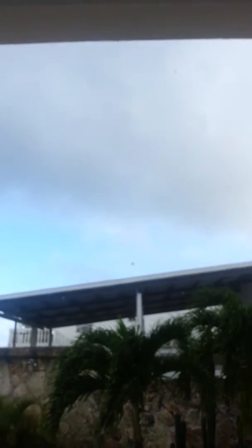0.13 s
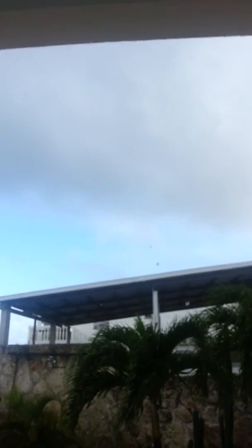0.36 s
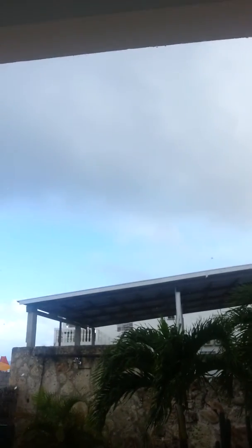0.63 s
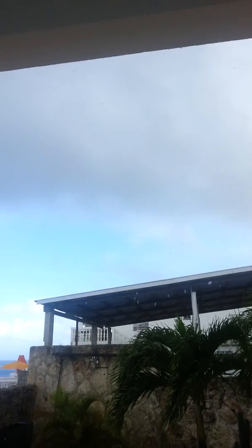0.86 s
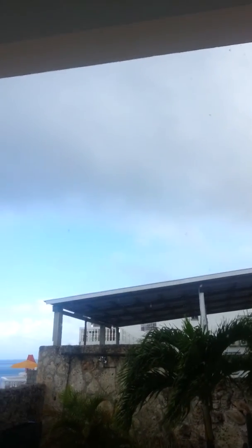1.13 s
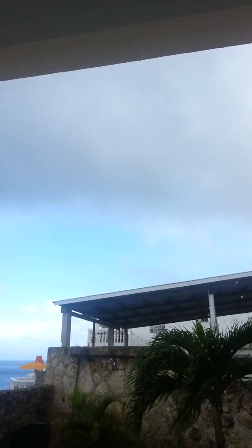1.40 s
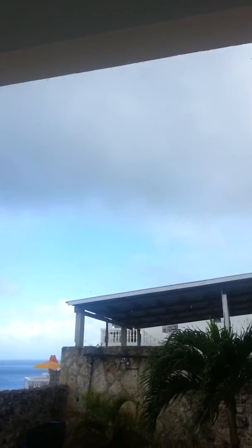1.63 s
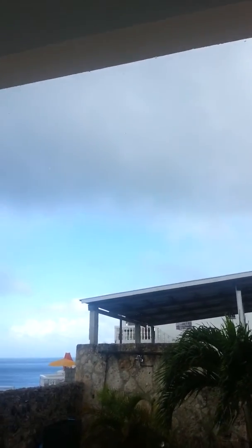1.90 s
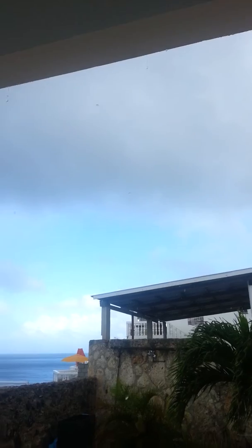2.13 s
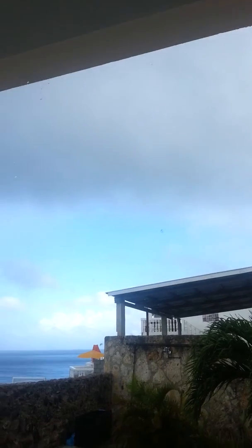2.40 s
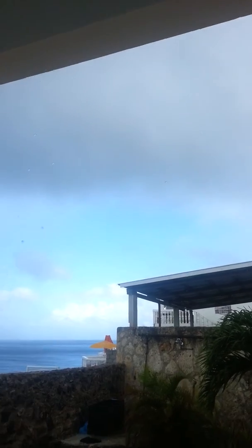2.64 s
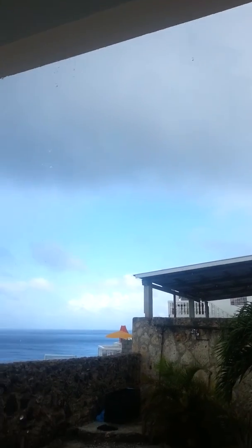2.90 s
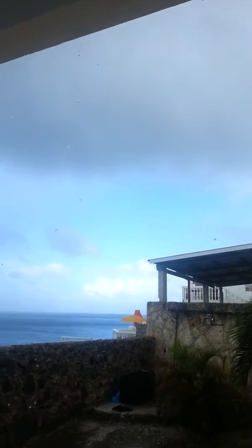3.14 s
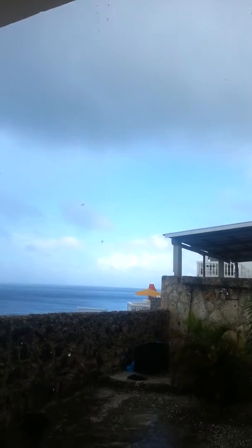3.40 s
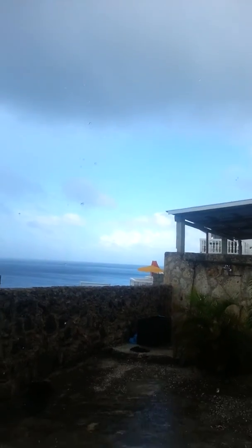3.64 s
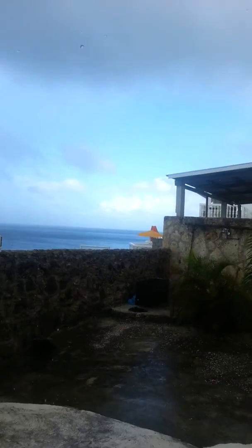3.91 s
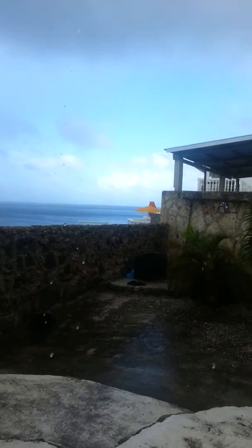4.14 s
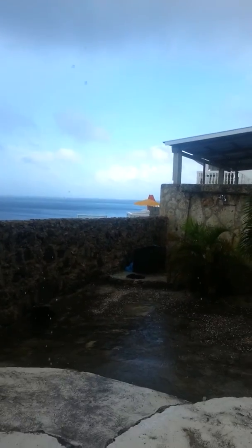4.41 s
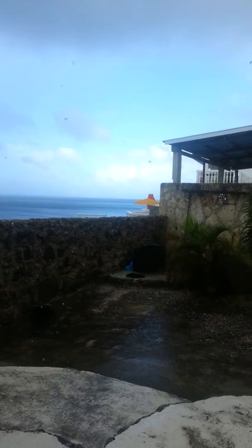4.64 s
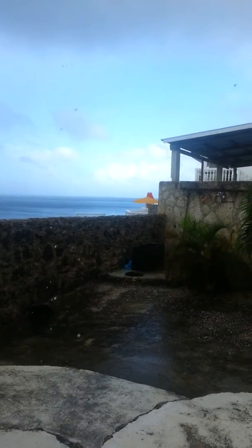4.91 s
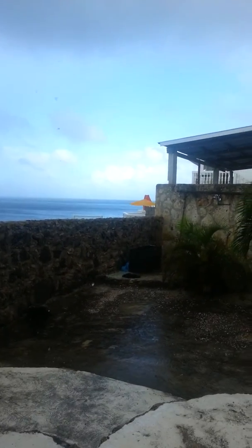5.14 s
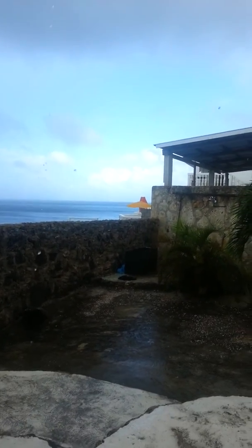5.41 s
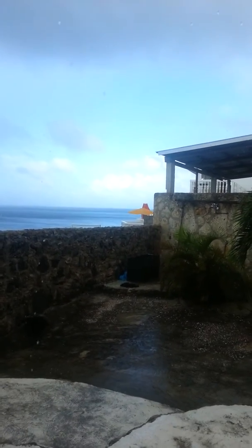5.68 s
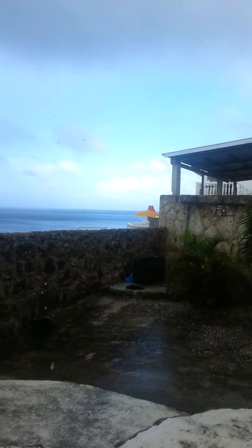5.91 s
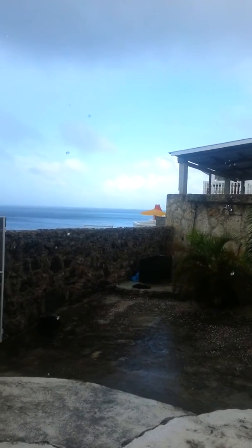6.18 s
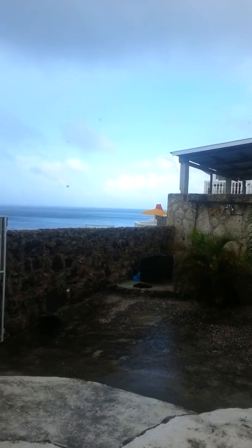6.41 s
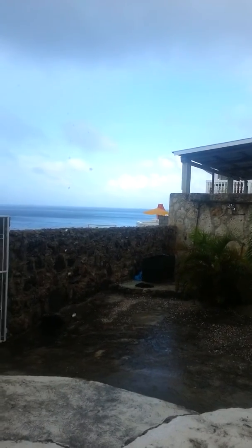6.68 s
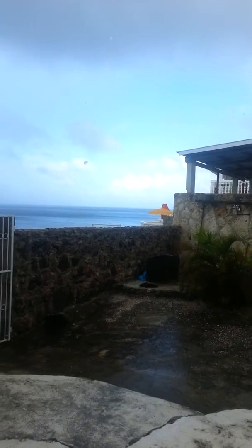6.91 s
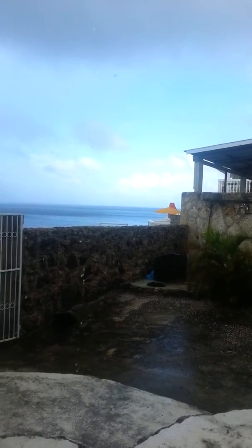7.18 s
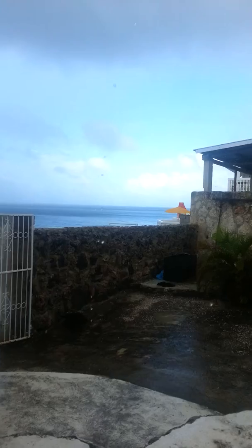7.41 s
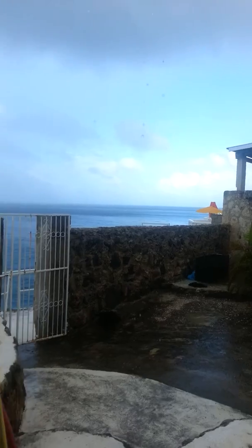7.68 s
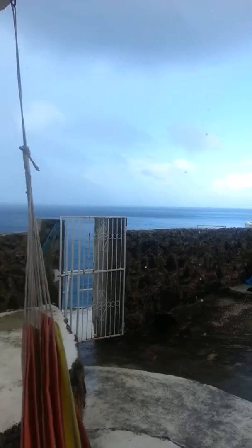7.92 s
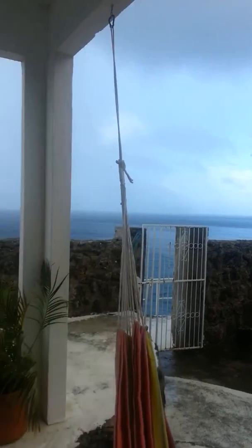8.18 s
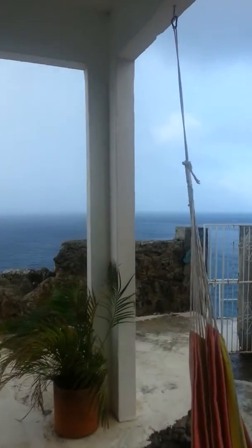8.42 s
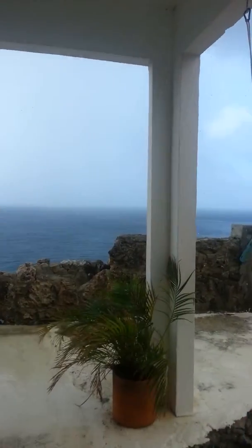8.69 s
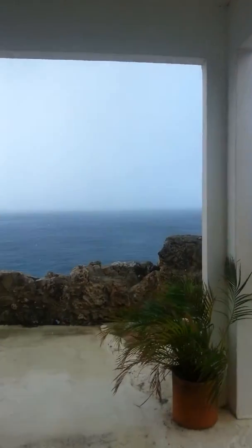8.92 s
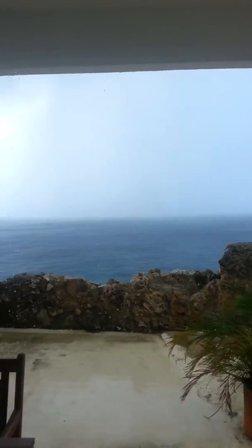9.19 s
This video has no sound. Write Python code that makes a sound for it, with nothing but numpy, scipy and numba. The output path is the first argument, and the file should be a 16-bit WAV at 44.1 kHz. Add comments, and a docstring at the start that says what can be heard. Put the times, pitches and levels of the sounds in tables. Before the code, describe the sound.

Close roof runoff splatters in quick irregular gulps on wet concrete, with sharp ringing drops and puddle plops over a soft, steady rain hiss.

```python
"""Rain on a concrete terrace: eave runoff breaks into gulps of ringing droplets that splatter on the wet slab.
Far rain is shaped noise; heavy drops slap the concrete and ring, fat drops plop low into a puddle. Ceiling,
floor and back wall of the porch return drops and plops as early echoes and a diffuse noise tail. A phone with
two microphone ports under the porch roof colours the sound and cuts bass and top. Apart from that, the level
just below the bass cut wavers and faint deeper bass flickers at random."""
import sys
import numpy as np
from scipy import signal
from scipy.fft import rfft, irfft, next_fast_len
from scipy.io import wavfile
from scipy.ndimage import uniform_filter1d
from numba import njit

SR = 44100
rng = np.random.default_rng(int(sys.argv[2]) if len(sys.argv) > 2 else 0)


def dump_mix(stems):
    """Bounce the given channels to the path in sys.argv[1] as a 16-bit WAV at rate SR."""
    frames = np.atleast_2d(stems).T  # one column per channel
    limited = np.clip(frames, -1, 1)  # hard clip at full scale
    pcm = np.round(limited * 32767).astype(np.int16)
    wavfile.write(sys.argv[1], SR, pcm)


def boost_factor(decibels):
    """Convert a level in decibels to a linear amplitude factor."""
    exponent = np.asarray(decibels, float) / 20
    return 10 ** exponent


N = 410571
# transform length [samples]
SPAN = next_fast_len(N, True)


def shape(points):
    """Value columns of a (frequency [Hz], value, ..) table on the FFT bins, linear in log frequency."""
    hz, *values = np.transpose(points)
    log_bins = np.log(np.arange(SPAN // 2 + 1) * SR / SPAN + 1)
    return np.array([np.interp(log_bins, np.log(hz), v) for v in values])


def walk(rate_hz):
    """Random levels held 1 / rate_hz s, smoothed twice; spread near 1."""
    hold = int(SR / rate_hz)
    steps = np.repeat(rng.standard_normal(N // hold + 1), hold)
    return 1.3 * uniform_filter1d(uniform_filter1d(steps, hold), hold)[:N]


# far rain on ground and leaves, relative spectrum: (frequency [Hz], density [dB per Hz])
HISS_SPECTRUM = [(40, -23), (120, -16.5), (200, -17), (240, -8), (280, -7.5), (460, -3.5), (900, -0.5),
                 (1500, -1), (3000, 0.5), (6000, -4.5), (10000, -11.5), (14500, -15.5)]
# port correlation for sound from all round: (frequency [Hz], correlation [-])
PORT_LIKENESS = [(60, 0.3), (130, 1), (290, 0.71), (640, 0.77), (1410, 0.07), (3100, 0.15), (6820, 0),
                 (15000, -0.01)]
# far rain, 300-1300 Hz, ahead of the near-1 dB swell and the phone: (time [s], level [dB])
HISS_LEVEL_CURVE = [(0, -34.5), (1, -36.5), (1.8, -35.5), (2.4, -38.5), (3, -36.5), (5.3, -36), (5.8, -35),
                    (6.6, -36), (8, -35.5), (9.31, -37.5)]


def far_rain():
    """Countless far drops merge into gently swelling noise; ports agree mostly at low frequencies."""
    like = np.clip(shape(PORT_LIKENESS)[0], 0, 1)
    mid, side = rfft(rng.standard_normal((2, SPAN))) * boost_factor(shape(HISS_SPECTRUM))
    mid, side = mid * np.sqrt(1 + like), side * np.sqrt(1 - like)
    hiss = irfft(np.array([mid + side, mid - side]), SPAN)[:, :N]
    body_band = signal.butter(4, [300, 1300], "band", fs=SR, output="sos")
    body = signal.sosfilt(body_band, hiss.mean(axis=0))
    level_db = np.interp(np.arange(N) / SR, *np.transpose(HISS_LEVEL_CURVE))
    return hiss / body.std() * boost_factor(level_db + .9 * walk(8))


@njit
def ring(start, hz, cycles, size):
    """Each impact is a sine that swells to its peak after the given cycles, then dies away."""
    out = np.zeros(N + 2048)
    for k in range(len(start)):
        rate = hz[k] / (cycles[k] * SR)
        turn = np.exp(2j * np.pi * hz[k] / SR - rate)
        z = size[k] * np.e * rate + 0j  # envelope peak = size
        for i in range(min(2000, int(9 / rate))):
            out[start[k] + i] += i * z.imag
            z *= turn
    return out[:N]


def impacts(s, hz, db, pan_db, cycles, lag_s, detune):
    """Impacts at both ports; each has its own place, so delay, pitch and level differ left and right."""
    place, tint, sign = rng.standard_normal((len(s), 3)).T
    # sound from the eave mostly reaches the right port a little earlier
    lag = lag_s * (.5 + place)
    ports = []
    for side in (1, -1):
        start = np.clip((s + side * lag / 2) * SR, 0, N - 1).astype(np.int64)
        pitch = np.clip(hz * np.exp(side * detune * tint), 300, .4 * SR)
        size = np.sign(sign) * boost_factor(db + side * pan_db / 2)
        ports.append(ring(start, pitch, cycles + 0 * s, size))
    return np.array(ports)


def shower(when, per_s, level_db, centre_hz, octaves, scatter_db, cycles):
    """Random droplets whose level and pitch follow the flow; scatter_db makes a few larger."""
    count = int(per_s * N / SR)
    s = rng.random(count) * N / SR
    hz = np.interp(s, when, centre_hz) * 2 ** (octaves * rng.standard_normal(count))
    size_db = scatter_db * np.minimum(rng.exponential(size=count), 3.6)
    # scale so that the mean of the two ports has the power of the level curve
    energy = np.mean(boost_factor(size_db) ** 2 * cycles / hz) * np.e ** 2 / 16
    db = size_db + np.interp(s, when, level_db) - 10 * np.log10(per_s * energy)
    return impacts(s, hz, db, 3.33 * rng.standard_normal(count), cycles, lag_s=.0004, detune=0.097)


# eave water: (start [s], length [s], splatter level ahead of sag [dB],
# droplet pitch ahead of runoff()'s factors [Hz], spray re splatter [dB])
EAVE_GULPS = [(0.0, 0.08, -30.5, 3270, -8), (0.07, 0.05, -26.0, 3300, -10), (0.125, 0.03, -23, 4100, -15),
              (0.208, 0.05, -34.0, 3060.0, -3), (0.28, 0.03, -27.0, 3940, -13),
              (0.426, 0.012, -29.5, 4120, -8), (0.502, 0.08, -28.5, 4100, -11),
              (0.583, 0.05, -24.5, 3900, -10), (0.75, 0.02, -26.5, 3800, -7),
              (0.809, 0.12, -28.5, 3600, -6.5), (0.855, 0.12, -32.5, 3980, -6),
              (1.089, 0.12, -26, 3450.0, -9), (1.232, 0.05, -25, 3540, -11),
              (1.402, 0.13, -26.5, 3750, -7.5), (1.476, 0.011, -25.5, 5340, -13),
              (1.558, 0.12, -28.5, 3900, -9), (1.707, 0.03, -25.5, 4100.0, -10),
              (1.756, 0.12, -26.5, 3860, -7.5), (1.863, 0.012, -23, 4050, -8),
              (2.029, 0.012, -23.5, 5150, -17), (2.093, 0.08, -27.5, 3200, -9),
              (2.202, 0.08, -25.5, 3650, -11), (2.353, 0.012, -28, 2700, -16),
              (2.521, 0.08, -27.5, 3370, -6.5), (2.63, 0.03, -29.0, 4230, -5),
              (2.71, 0.12, -26.5, 3600, -8), (2.747, 0.012, -23, 3700, -13), (2.928, 0.12, -26, 3560, -9),
              (3.062, 0.013, -26.5, 4400.0, -9), (3.143, 0.03, -26.5, 3840, -12),
              (3.223, 0.08, -27, 3800, -8), (3.32, 0.08, -23.5, 3070, -10), (3.445, 0.12, -30, 4050, -7),
              (3.517, 0.012, -30, 2700, -3), (3.652, 0.12, -27, 4130, -7.5),
              (3.784, 0.046, -31.5, 3600, -16), (3.882, 0.12, -29.5, 4060, -6.5),
              (3.995, 0.03, -29, 3700, -8), (4.123, 0.05, -23.5, 3730, -6.5),
              (4.255, 0.08, -24.5, 4150, -11), (4.364, 0.03, -25.5, 3900, -17),
              (4.415, 0.03, -27.5, 3900, -9), (4.466, 0.012, -26, 4400, -7), (4.508, 0.014, -28, 3820, -9),
              (4.557, 0.12, -30, 3500, -8), (4.605, 0.011, -25.5, 5540, -9),
              (4.711, 0.033, -26.5, 3730, -5.5), (4.835, 0.05, -24.5, 4100, -7.5),
              (4.935, 0.12, -28.5, 3230, -8), (5.117, 0.01, -25, 3770, -5), (5.194, 0.12, -30.5, 3570, -4),
              (5.356, 0.03, -24, 3750, -15), (5.529, 0.035, -27.5, 3450, -8),
              (5.626, 0.03, -26.5, 4350, -11), (5.703, 0.12, -26, 3700, -8),
              (5.809, 0.12, -29.0, 3660, -6.5), (5.994, 0.028, -23, 4220, -15),
              (6.088, 0.012, -24, 3200, -10), (6.172, 0.12, -28, 3360, -10),
              (6.251, 0.012, -25.5, 2880, -15), (6.312, 0.12, -30, 4020, -3),
              (6.469, 0.12, -27.0, 3850, -13.5), (6.668, 0.12, -30.5, 3660, -8),
              (6.784, 0.012, -28.5, 5390.0, -6), (6.88, 0.08, -31.0, 3850, -7),
              (7.027, 0.12, -29.5, 3600, -3.5), (7.137, 0.03, -23, 3900, -21),
              (7.159, 0.12, -29.5, 3800, -13), (7.253, 0.12, -29, 3700, -13),
              (7.344, 0.12, -30.5, 3580, -8), (7.416, 0.08, -29, 3340, -8),
              (7.552, 0.05, -24, 4100.0, -7.5), (7.729, 0.05, -26.5, 3500, -7),
              (7.851, 0.05, -27.0, 3650, -9), (7.963, 0.08, -27.0, 3720.0, -4.5),
              (8.089, 0.08, -29, 4100.0, -10), (8.189, 0.12, -28.5, 3370, -6),
              (8.396, 0.08, -28.5, 3340, -5), (8.467, 0.03, -28.5, 4230, -17),
              (8.507, 0.12, -27.0, 3630, -6), (8.58, 0.1, -29.5, 3120, -4), (8.81, 0.05, -31.0, 3930, -11),
              (8.873, 0.12, -27, 3560, -7.5), (8.915, 0.012, -22.5, 3200, -13),
              (9.028, 0.012, -28.5, 3820, -1), (9.07, 0.12, -29, 4430, -5.5),
              (9.22, 0.08, -26.0, 3600, -3.5)]
GULP_ATTACK_S, GULP_SAG_S, GULP_RELEASE_S = .004, .2, 0.027
# steady trickle, pitch ahead of the same factors
TRICKLE_DB, TRICKLE_HZ, TRICKLE_SPRAY_DB = -34.5, 4100, -39.5


def flow():
    """Splatter level, droplet pitch and spray level each ms: overlapping gulps add their power."""
    t = np.arange(0, N / SR + .001, .001)
    s, length_s, db, hz, spray_db = np.transpose(EAVE_GULPS)[:, :, None]
    attack = np.clip((t - s) / GULP_ATTACK_S, 0, 1)
    sag = np.exp(-np.clip(t - s, 0, length_s) / GULP_SAG_S)
    release = np.exp(-np.maximum(t - s - length_s, 0) / GULP_RELEASE_S)
    power = attack * sag * release * boost_factor(db) ** 2
    trickle = boost_factor(TRICKLE_DB) ** 2
    total = power.sum(axis=0) + trickle
    ring_hz = ((power * hz).sum(axis=0) + trickle * TRICKLE_HZ) / total
    spray = (power * boost_factor(spray_db) ** 2).sum(axis=0) + boost_factor(TRICKLE_SPRAY_DB) ** 2
    return t, 10 * np.log10(total), ring_hz, 10 * np.log10(spray)


def runoff():
    """Gulps and trickle throw coarse splatter, its pitch wandering as the stream breaks up, and bright spray."""
    when, db, hz, spray_db = flow()
    wander_octaves = .12 * np.interp(when, np.arange(N) / SR, walk(45))
    splatter_hz = 1.108 * hz * 2 ** wander_octaves
    splatter = shower(when, 1400, db, splatter_hz, octaves=0.28, scatter_db=2.3, cycles=1.2)
    spray = shower(when, 2200, spray_db, 9500 + 0 * hz, octaves=0.38, scatter_db=0.0, cycles=0.79)
    return splatter + spray


MIDDLING_PER_S, MIDDLING_RING_DB, MIDDLING_SCATTER_DB = 16, -17.5, 1.5
MIDDLING_SLAP_RE_RING_DB, MIDDLING_OCTAVES = -5, .3
MIDDLING_PAN_DB = 4  # both mean and spread


def middling_drops():
    """Rows like the heaviest drops, at random moments that crowd where the flow is strong."""
    when, db, hz, _ = flow()
    share = np.cumsum(boost_factor(db) ** 2)
    count = int(MIDDLING_PER_S * N / SR)
    quantile = (np.arange(count) + rng.random(count)) / count
    s = np.interp(quantile, share / share[-1], when)
    chance = rng.standard_normal((count, 4)).T
    ring_db = MIDDLING_RING_DB + MIDDLING_SCATTER_DB * np.clip(chance[0], -2, 2)
    ring_hz = np.interp(s, when, hz) * 2 ** (MIDDLING_OCTAVES * chance[1])
    slap_db = ring_db + MIDDLING_SLAP_RE_RING_DB + MIDDLING_SCATTER_DB * np.clip(chance[2], -2, 2)
    return np.array([s, ring_db, ring_hz, slap_db, MIDDLING_PAN_DB * (1 + chance[3])])


# heaviest drops, levels ahead of the filters:
# (time [s], ring peak [dB], ring [Hz], slap peak [dB], left minus right [dB])
HEAVIEST_DROPS = [(0.101, -10, 3500.0, -16.0, 12), (0.1194, -4, 2950, -13.5, 5.5),
                  (0.138, -7, 4500, -6, -4), (0.144, -6, 3900, -7, 4), (0.147, -1, 4210, -9, 10),
                  (0.286, -10, 3900, -13, -2), (0.307, -8, 4900, -11, 12), (0.5495, -12, 6940, -14, 2),
                  (0.5904, -5, 4770, -15, 0.0), (0.76, -12, 4300.0, -17, 2), (0.8884, -3, 3780, -13, -8),
                  (1.104, -4, 4400.0, -18, 3), (1.123, -6, 4170, -14, -1), (1.136, -1, 3840, -5, 4.0),
                  (1.222, -5, 3800, -15, -3), (1.262, -8, 3800, -16, 3), (1.396, -7, 4330, -20, 5),
                  (1.4395, -12, 5700, -11, 0), (1.488, -5, 4900.0, -9.0, 4), (1.5249, -13, 4470.0, -4, -3),
                  (1.6163, -8, 3050, -2, 7), (1.6456, -17, 5000, -7, 5), (1.7153, -16, 4040.0, -12, -4),
                  (1.7775, -3, 3570, -28.0, 3), (1.866, -11, 3220, -7.0, -1), (1.8778, -21, 4130, -14, 4.0),
                  (1.9875, -9, 4860, -3, 5), (2.0373, -7, 4820, -15, 1), (2.1074, -7, 3360, -8, 4),
                  (2.2277, -11, 3480, -17.0, -5), (2.2497, -14, 3730.0, -5, 0.0),
                  (2.2563, -4, 4110.0, -12.0, -2.0), (2.274, -8, 4160.0, -16, -3.0),
                  (2.277, -8, 4120, -20, 12), (2.359, -17, 3000, -20, 7), (2.531, -17, 3540, -18, 2),
                  (2.552, -6, 3900, -17, 1), (2.649, -10, 4900, -16, -1), (2.729, -8, 3920, -13, 14),
                  (2.7321, -9, 4340, -19, 8), (2.9365, -20, 5000, -9, 0), (3.009, -5, 2950, -20, -5),
                  (3.0853, -9, 4700, -5, -3), (3.143, -19, 4070, -17, 2), (3.233, -9, 3850, -7, 5),
                  (3.3229, -23, 4830, -0.5, 13), (3.3955, -11, 2840, -19, -6), (3.4515, -8, 3820, -16, 4),
                  (3.5348, -8, 3150.0, -12, 7), (3.5374, -6, 3360, -16, 9), (3.657, -10, 5100, -15, 2),
                  (3.6667, -10, 4730.0, -11, -7), (3.702, -5, 4970, -15, 3), (3.8012, -5.5, 3300, -4, 9),
                  (3.8293, -4, 4100, -13, 10), (3.893, 0, 3860, -32, 5), (3.978, -14, 5000, -4, 0),
                  (3.9875, -5, 5100, -13, 2), (4.0215, -6, 3520, -11, -8), (4.1085, -10, 4540, -10, 4),
                  (4.113, -14, 4530, -16, 2), (4.1325, -5, 3980.0, -16, -2), (4.1414, -9, 4200, -16, -6),
                  (4.1601, -4, 3750, -17, -2), (4.2125, -10, 6500, -8, 2), (4.217, -18, 3940, -12, 2),
                  (4.3142, -2, 4600, -12, 0), (4.3372, -5, 6000, -3, -1), (4.3665, -7, 4060, -14, 0),
                  (4.3808, -3, 4360, -7, 1), (4.3846, -6, 4260, -6, -8), (4.389, -16, 4800, -12, 2),
                  (4.4229, -4.5, 4400, -21, -1), (4.4776, -5, 4220, -16, 11),
                  (4.5069, -16, 4560.0, -8, 3.0), (4.6064, -13, 3900.0, -6, 9),
                  (4.6205, -8, 4720.0, -13.0, -7), (4.716, -9, 3200.0, -17, 6.0),
                  (4.843, -16, 4590, -17, -2), (4.8568, -8, 4200, -15, -3), (4.9537, -10, 2790, -18, 10),
                  (4.9981, -22, 4850.0, -5, 2), (5.028, -8, 4000.0, -19.0, 10),
                  (5.1255, -15, 3640.0, -17, 21.5), (5.3464, -8, 4300.0, -21, 14),
                  (5.3715, -12, 4000.0, -15, 0), (5.541, -14, 4590, -17, 3), (5.6325, -15, 3840, -14, 2),
                  (5.716, -14, 3460, -12, 0), (5.724, -1, 4050, -12, -6), (5.7342, -9, 4480.0, -15.0, 0.0),
                  (5.7559, -8, 4100, -18.0, 0.0), (5.7809, -13, 4060.0, -8.0, 6.0),
                  (5.8165, -3.5, 3700, -15, 1.5), (5.8968, -7, 5110.0, -5, 2), (6.005, -5, 4280.0, -17, 6),
                  (6.0833, 5, 4370, 0, 8), (6.0908, -5, 3180, -17, 4), (6.1795, -7, 2840, -20.0, 2),
                  (6.2482, -5, 3350, -6, 1.0), (6.262, -1, 3150.0, -5, -7), (6.2682, -7, 3630.0, -4, 6),
                  (6.3147, -4, 4040, -11.0, 6), (6.396, -10, 5470, 1, 1), (6.481, -8, 3360, -18, 2),
                  (6.488, -5, 3400, -18.0, -2), (6.5784, -4, 6040, -11, 16), (6.7695, -16, 5200, -7, -4),
                  (6.7762, -4, 5000, -18, -4), (6.885, -4, 4270, -12, -2), (7.0654, -8, 3570, -2.5, 8),
                  (7.0745, -17, 4300, -10, -1), (7.137, -7, 4020, -16, -1.0), (7.1437, -6, 4200, -15.0, -4),
                  (7.1543, -5, 3520, -17.0, 7), (7.169, -9, 3770.0, -15, 2), (7.217, -12, 4800, -11, -13),
                  (7.2466, -6, 4020.0, -10, -17), (7.272, -16, 5000, -14, 2), (7.3395, -6, 4540, -6, 5),
                  (7.436, -8.5, 2600.0, -22, 4), (7.4736, -3.5, 4700, -13, 16), (7.5697, -8, 4820.0, -8, 0),
                  (7.735, -4, 4400, -15.0, 0), (7.852, -11, 4000, -20, 4), (7.8807, -6, 4000, -18, 3),
                  (7.9954, -5, 4110, -12.0, -8), (8.11, -7.5, 4000, -19, 1), (8.1691, -12, 4080, -4, -4),
                  (8.234, -8, 3930, -18, 4), (8.2573, -6, 4250, -22, 7), (8.2858, -4, 4240, -21.0, 7.5),
                  (8.4155, -4.0, 3900, -14.0, -4), (8.4715, -8, 3300, -19, 3), (8.487, -5, 4170, -19, 4),
                  (8.4914, -9, 4100, -15, 0), (8.5678, -3, 3120, -17.0, -2), (8.572, -2, 3060, -17.0, 0),
                  (8.9166, -8.0, 3160.0, -6, -10), (8.9246, -8, 2990.0, -15, -5),
                  (8.9534, -6, 4100.0, -11.0, -3.0), (9.0396, -16, 4460, -8, 2),
                  (9.2289, -19, 4600, -6, 10), (9.2379, -11, 4300, -12, -9), (9.249, -8, 4200.0, -10, 0),
                  (0.1564, -10, 4260, -15, 3.0), (0.7514, -12, 5000, -13, 3.5), (0.818, -11, 3100, -16, 1),
                  (0.8584, -9, 3820, -13, 2.0), (0.9024, -13, 3780, -13, 3.0),
                  (1.4124, -17, 4360, -21, 3.5), (1.6387, -9, 3010, -13, -2), (1.7204, -18, 4720, -13, 1.5),
                  (2.8304, -8, 3840, -16, 6), (3.0424, -10, 2950, -11, 2.5), (3.2725, -8, 4470, -15, 1.0),
                  (3.4084, -4, 3690, -15, 4.5), (3.4544, -10, 4250, -18, 4.0), (3.7214, -5, 3600, -13, 4.0),
                  (3.7374, -14, 3540, -13, 2.0), (5.8074, -12, 4040, -15, 4.0),
                  (5.8784, -16, 2920, -13, 1.5), (6.0204, -10, 4590, -13, 3.5),
                  (6.1069, -16, 3720, -13, 3.0), (6.2154, -11, 4030, -9, 3.5),
                  (6.4534, -15, 4600, -11, 2.5), (6.5004, -9, 3560, -11, 3.5), (6.7824, -8, 5050, -13, 1.5),
                  (7.0374, -9, 2720, -13, 1.0), (7.1764, -10, 4290, -13, 2.0), (7.2654, -7, 3920, -13, 4.0),
                  (7.3334, -10, 4550, -13, 3.0), (7.5814, -9, 5100, -13, 2.0), (7.5874, -14, 2920, -13, 0),
                  (7.6204, -19, 4110, -13, 3.5), (8.1738, -11, 5030, -17, 1.0),
                  (8.4284, -15, 3570, -13, 1.5), (8.8894, -11, 2870, -7, -2), (8.9464, -11, 3270, -13, 0),
                  (8.9574, -13, 3860, -13, 3.5), (9.0754, -11, 4700, -13, -0.5),
                  (9.0824, -16, 4760, -11, 1.5)]
# early porch reflections, shared with plops(): (mean delay [s], base level [dB])
PORCH_ECHOES = [(.0032, -10), (.0070, -10)]


def heavy_drops():
    """A bright slap on concrete, a short ring of the water film, and echoes with a delay of their own."""
    s, db, hz, slap_db, pan_db = np.hstack([np.transpose(HEAVIEST_DROPS), middling_drops()])
    slap_hz = 7400 * 2 ** (.2 * rng.standard_normal(len(s)))
    out = impacts(s, slap_hz, slap_db, pan_db, cycles=.7, lag_s=.00025, detune=.15)
    out += impacts(s, hz, db, pan_db, cycles=.8, lag_s=.00016, detune=.12)
    for delay_s, echo_db in PORCH_ECHOES:
        late_s = delay_s * (1 + .12 * rng.standard_normal(len(s)))
        out += impacts(s + late_s, 0.92 * hz, db + echo_db, 0 * pan_db,
                       cycles=1.6, lag_s=0.00045, detune=0.15)
    return out


# fat drops into the puddle, levels ahead of the filters:
# (time [s], peak [dB], ring [Hz], left minus right [dB])
PUDDLE_PLOPS = [(0.0952, -11, 2130, 2), (0.6394, -14, 2570, 6), (1.0959, -17, 2620, 5.5),
                (1.135, -14, 2590, 3.0), (1.171, -5, 2660, 2), (1.4482, -10, 2470, -2),
                (1.615, -12, 2580, 4.0), (1.7944, -20, 2140, 4.0), (1.8716, -11, 2620, 3.0),
                (2.1056, -17, 3000, 4.0), (2.144, -16, 2540, 2), (2.1594, -23, 2260, 4.0),
                (2.2104, -11, 2840, 4.5), (2.2324, -14, 2300, 4), (2.359, -18, 2740, 6.5),
                (2.3844, -24, 2870, 4.0), (3.0106, -20, 2300, 2), (3.349, -8, 2970, 4.5),
                (3.36, -8, 2780, -0.5), (3.3704, -6, 2590, 0), (3.4007, -9, 1810, 1),
                (3.4144, -16, 2150, 5.5), (3.5342, -19, 2470, 4.5), (4.1637, -18, 2570, 6.5),
                (4.368, -7, 2530, 7), (4.3814, -9, 2760, 7), (4.7156, -19, 2490, 4.5),
                (4.9493, -17, 2910, 5.0), (5.026, -15, 2440, 5.5), (5.8117, -15, 2590, 4.0),
                (5.8294, -16, 2270, 3.0), (6.0835, -10, 2870, 8), (6.179, -25, 2260, 0),
                (6.2606, -14, 2610, 0), (6.3142, -10, 2940, 5.5), (6.5755, -15, 2200, 3.5),
                (7.1367, -10, 2980, 8), (7.2609, -15, 2200, 5.0), (7.428, -7, 2500, 4.5),
                (7.4494, -22, 2360, 4.5), (8.0444, -13, 2520, 2.0), (8.2846, -11.5, 2130, 11),
                (8.3094, -14, 2030, 6.5), (8.5667, -11, 1960, 4), (8.5724, -11.5, 1960, 5.0),
                (8.5897, -9, 2130, 4.5), (8.6727, -13, 2350, 3.5), (8.9156, -15, 2620, 3.5),
                (8.991, -10, 2210, 2)]
PLOP_CYCLES, PLOP_ECHO_BOOST_DB = 1.15, 2


def plops():
    """A drop into standing water rings low for a few cycles; the porch repeats it."""
    s, db, hz, pan_db = np.transpose(PUDDLE_PLOPS)
    out = impacts(s, hz, db, pan_db, PLOP_CYCLES, lag_s=.0001, detune=0.048)
    for delay_s, echo_db in PORCH_ECHOES:
        late_s = delay_s * (1 + 0.11 * rng.standard_normal(len(s)))
        out += impacts(s + late_s, hz, db + echo_db + PLOP_ECHO_BOOST_DB, pan_db,
                       PLOP_CYCLES, lag_s=0.00027, detune=0.19)
    return out


# diffuse tail: (low edge [Hz], high edge [Hz], level re smoothed hits [dB], 60 dB decay [s])
PORCH_TAIL = [(1600, 2400, -6, .3), (2400, 3400, -5, .3), (3400, 4600, -3.5, .3), (4600, 6200, -3.5, .26),
              (6200, 9000, -4, .2), (9000, 13500, -5, .16)]


def porch(hits):
    """The diffuse tail: in each band, noise that builds up after a splat and dies away."""
    out = 0
    for low_hz, high_hz, db, t60_s in PORCH_TAIL:
        band = signal.butter(2, [low_hz, high_hz], "band", fs=SR, output="sos")
        power = np.mean(signal.sosfilt(band, hits) ** 2, axis=0)
        decay_keep = boost_factor(-120 / (t60_s * SR))
        build_keep = np.exp(-1 / (.005 * SR))
        for keep in (decay_keep, build_keep):
            power = signal.lfilter([1 - keep], [1, -keep], power)
        noise = signal.sosfilt(band, rng.standard_normal((2, N)))
        out = out + boost_factor(db) * np.sqrt(power) * noise / noise.std()
    return out


def scene():
    """Near water in the porch over the far rain."""
    drops = heavy_drops() + plops()
    # a thin film on solid concrete radiates no bass
    no_bass = signal.butter(2, 1300, "high", fs=SR, output="sos")
    near = signal.sosfilt(no_bass, runoff() + drops)
    return near + porch(drops) + far_rain()


# microphone port colour: (frequency [Hz], left gain [dB], right gain [dB])
PORT_COLOUR = [(696, 1.5, 1.5), (1340, 2.5, -0.5), (2210, 3, -1.5), (3150, -1, -3), (4100, 2.5, -3),
               (4900, 1.5, 0.5), (6100, -3, 1), (6500, 0.5, 2), (9700, 4, 2), (11500, 3.5, 3.5),
               (15000, 1, 2.5)]


def port_colour(dry):
    """Each microphone port has its own frequency response."""
    return irfft(rfft(dry, SPAN) * boost_factor(shape(PORT_COLOUR)), SPAN)[:, :N]


LOW_CUT_HZ, EDGE_HZ = 285, 200
EDGE_DB, EDGE_SWING_DB = -8, 22  # band between the two, capped at 0 dB
FLICKER_DB, FLICKER_ABOVE, FLICKER_REST = -4, 0.54, 0.022  # threshold and resting gain ahead of FLICKER_DB


def bass_cut_and_flicker(x):
    """A steep bass cut; apart from it, the level just below wavers and faint deeper bass flickers at random."""
    def steep(hz, kind):
        return signal.sosfilt(signal.cheby1(7, .5, hz, kind, fs=SR, output="sos"), x)

    edge_db = np.minimum(EDGE_DB + EDGE_SWING_DB * walk(16), 0)
    flicker_gain = np.clip(2.4 * (walk(28) - FLICKER_ABOVE), FLICKER_REST, 1)
    edge = boost_factor(edge_db) * steep([EDGE_HZ, LOW_CUT_HZ], "band")
    flicker = boost_factor(FLICKER_DB) * flicker_gain * steep(EDGE_HZ, "low")
    return steep(LOW_CUT_HZ, "high") + edge + flicker


def band_limit(x):
    """A steep low-pass at the top of the band."""
    return signal.sosfilt(signal.butter(12, 15810, fs=SR, output="sos"), x)


KNEE, TOP_HZ = 1.0, 14500  # knee in full-scale units


def record(dry):
    """Port colour, rounded peaks, steep bass and top cuts, random bass flicker, hardest slaps clipped."""
    x = port_colour(dry)
    x = bass_cut_and_flicker(KNEE * np.tanh(x / KNEE))
    x = signal.sosfilt(signal.cheby1(10, .5, TOP_HZ, fs=SR, output="sos"), x)
    return band_limit(np.clip(x, -1, 1))


dry = scene()
out = record(dry)
dump_mix(out)
```